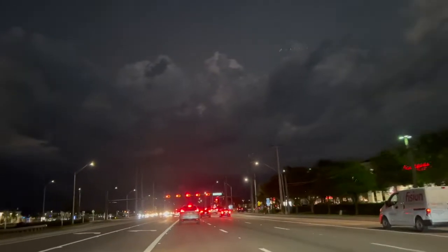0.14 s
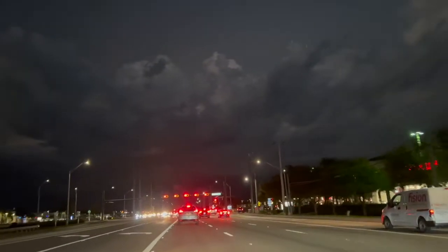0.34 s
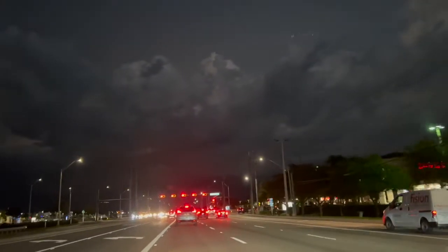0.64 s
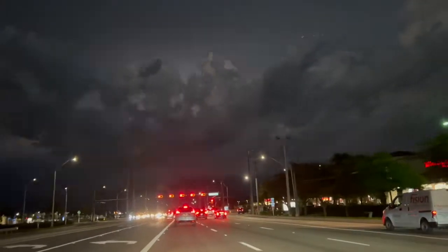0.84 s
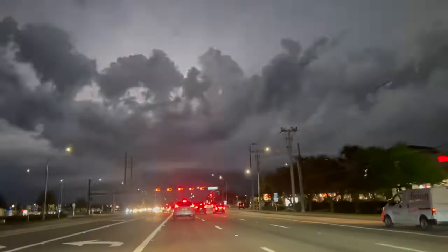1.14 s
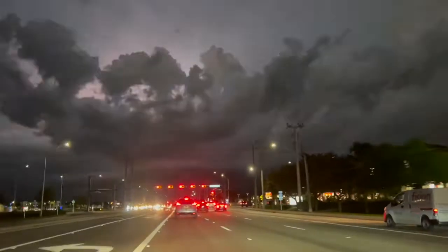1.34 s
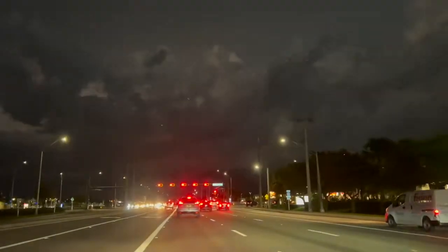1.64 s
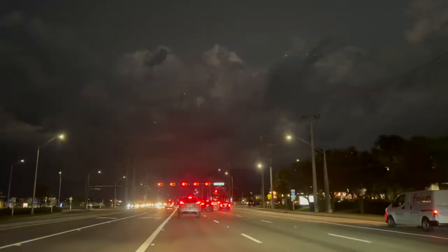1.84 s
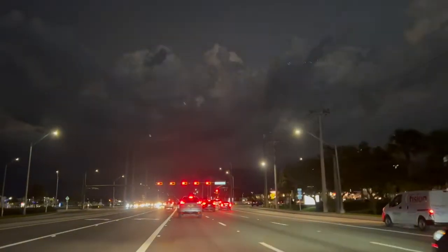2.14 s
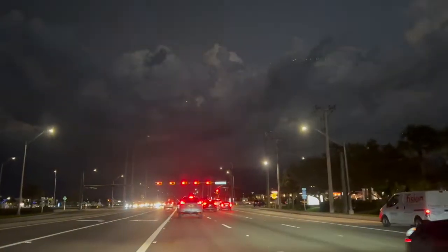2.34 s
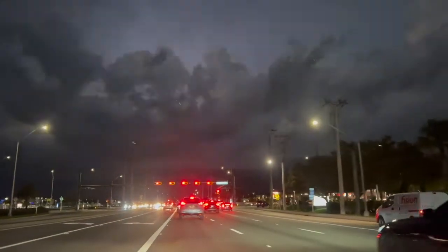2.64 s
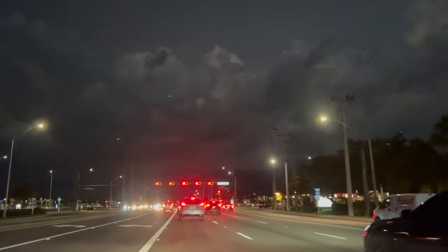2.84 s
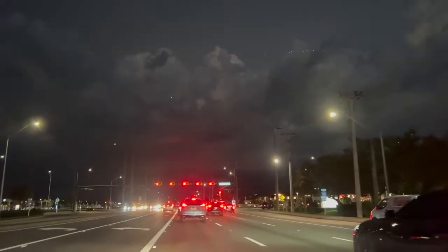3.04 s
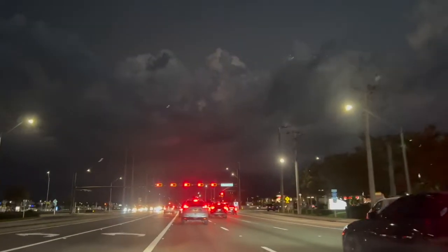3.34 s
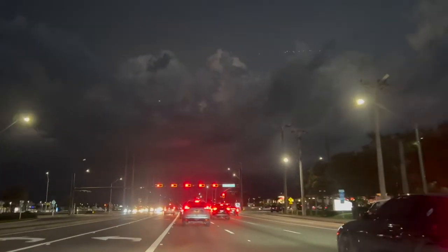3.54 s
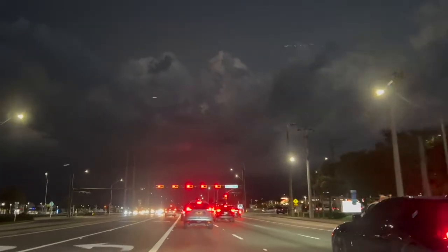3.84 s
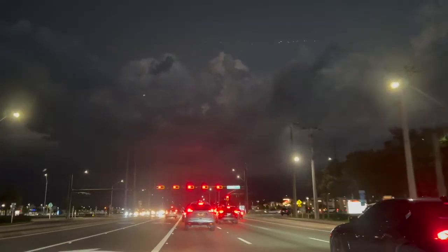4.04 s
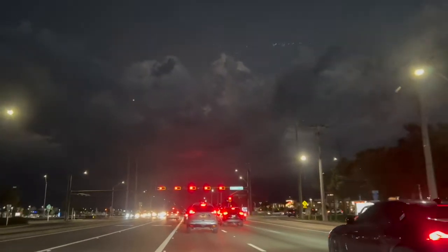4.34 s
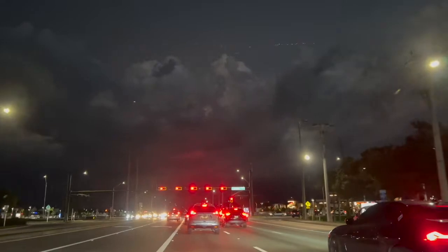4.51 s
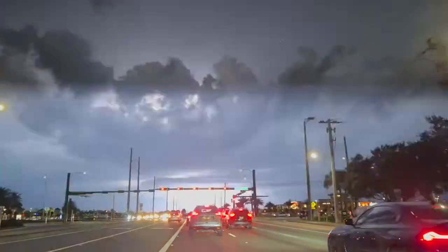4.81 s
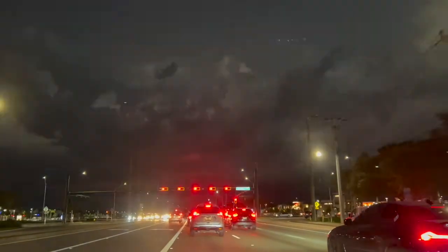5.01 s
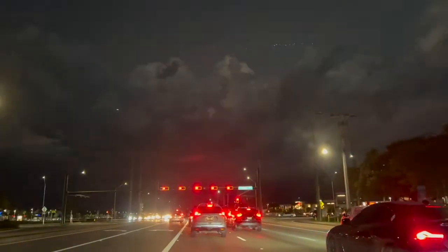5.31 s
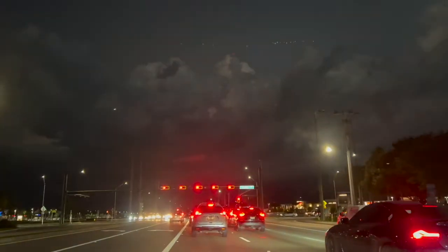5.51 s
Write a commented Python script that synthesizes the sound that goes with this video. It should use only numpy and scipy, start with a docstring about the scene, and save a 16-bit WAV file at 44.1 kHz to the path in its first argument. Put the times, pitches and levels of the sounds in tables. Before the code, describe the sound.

Heard from the front seat of a car slowing in evening traffic: a very low, nearly pure engine boom over road rumble, with soft vent air. Tyre wash and briefly singing tread fade over the first two to three seconds. Sparse raindrops tick on the windscreen, one sharpest just before one second. Engine pitch rises briefly midway, then sinks before recovering slightly at the end.

```python
"""Inside a car that slows in traffic under scattered rain.
The engine booms at its firing rate, with sine overtones that form a thin whine, an airy intake growl and a dull churn.
Shaped noise makes the road rumble, the vents, the fading tyre wash with its spray and the far traffic;
narrow noise bands make the tread sing. Two hums wander beneath.
Raindrops tick on the windscreen as clicks spread out by the glass, among a few soft rustles."""
import sys
import numpy as np
from scipy import signal
from scipy.fft import rfft, irfft, next_fast_len
from scipy.io import wavfile
from scipy.ndimage import uniform_filter1d

SR = 44100
rng = np.random.default_rng(int(sys.argv[2]) if len(sys.argv) > 2 else 0)


def generate_wav(sig):
    """Save sig (samples, or channels by samples) to the path in sys.argv[1] as 16-bit PCM at SR."""
    pcm = np.round(np.clip(np.atleast_2d(sig).T, -1, 1) * 32767).astype(np.int16)
    wavfile.write(sys.argv[1], SR, pcm)


N = 250047
TIME = np.arange(N) / SR

# engine speed: t/s, firing rate f/Hz
REVS = [(0, 48), (0.33, 46.2), (0.66, 46.8), (0.92, 45.6), (1.2, 46.1), (2.1, 44.6), (2.5, 50.8),
        (2.78, 51.6), (3.05, 51.1), (4.0, 45.2), (4.35, 42.4), (4.9, 40), (5.12, 41), (5.42, 45.6),
        (5.67, 46.3)]
# firing rate below which the boom and the whine lose level
BOOM_FULL_HZ = 45.6
# time constant of the slowing car
SLOWING_S = 2.18


def gain_of(db):
    """Decibels to a factor."""
    return 10 ** (np.asarray(db) / 20)


def evened(x):
    """Scales to rms 1."""
    return x / np.sqrt(np.mean(x ** 2) + 1e-20)


def read(points, hz):
    """Joins (f/Hz, value) points on a log-frequency axis."""
    f, value = np.transpose(points)
    return np.interp(np.log(hz + 1), np.log(f + 1), value)


def follow(rows):
    """Each column of a curve over time, sample by sample."""
    s, *columns = np.transpose(rows)
    return [np.interp(TIME, s, c) for c in columns]


def add(mix, s, sound):
    """Mixes a stereo sound in at time s."""
    start = max(round(s * SR), 0)
    part = mix[:, start:][:, :sound.shape[1]]
    part += sound[:, :part.shape[1]]


def sides(balance_db):
    """Left and right gains for a left-minus-right balance."""
    return gain_of(np.array([[balance_db], [-balance_db]]) / 2)


def drift(rate_hz):
    """Slow random wander of rms 1, up to about the given rate."""
    coarse = TIME[::8]
    hz = np.fft.rfftfreq(len(coarse), coarse[1])
    spectrum = rfft(rng.standard_normal(len(coarse))) * np.exp(-(hz / rate_hz) ** 2)
    return evened(np.interp(TIME, coarse, irfft(spectrum, len(coarse))))


def peaks(resonances, hz):
    """Lift in dB from resonances (f/Hz, width/Hz, level/dB)."""
    return sum(db / (1 + (2 * (hz - f) / width) ** 2) for f, width, db in resonances)


def standing_waves(hz):
    """The cabin favours some tones and swallows others: dB for sound in step and out of step at the ears."""
    # cabin modes: f/Hz, width/Hz, level in step/dB, level out of step/dB
    cabin = [(418, 30, 2.5, -1.5), (555, 78, 2, -4), (650, 81, 1.5, 7.5), (713, 83, 3.5, 2.5),
             (830.5, 63, 6.5, 3), (1050, 82, 3.5, 4), (1140, 33, -0.5, 0), (1161, 35, 4, 8.5),
             (1303, 78, 4, 1.5), (1380, 95, -2, -1.5), (1572, 160, 3, -1), (1690, 66, 4, 8),
             (1767, 47, -5, 0), (1850, 71, 5.5, -0.5), (1990, 110, -0.5, 2), (2164, 140, 3, -2.5),
             (2500, 43, -2.5, -5.5), (3060, 76, -2, -5.5), (4940, 78, 4, 5.5), (5500, 340, -4, 2.5),
             (6860, 300, -2.5, -4)]
    return sum(np.array([[in_db], [out_db]]) / (1 + (2 * (hz - f) / width) ** 2)
               for f, width, in_db, out_db in cabin)


def cabin_noise(spectrum, low_hz, balance_db, resonances=(), ripple_db=2.5):
    """Noise of rms 1 before balance; standing waves colour it and set the ears in or out of step."""
    # likeness of the two ears: f/Hz, correlation (-1..1)
    likeness = [(100,0.92), (270,0.95), (430,0.21), (620,-0.57), (730,-0.71), (870,-0.046), (1120,-0.57),
                (1400,-0.18), (1580,.2), (1750,-0.31), (2100,-0.18), (6500,0.42), (9800,-0.55),
                (12000,-0.026)]
    size = next_fast_len(N)
    hz = np.fft.rfftfreq(size, 1 / SR)
    same = np.clip(read(likeness, hz), -.999, .999)
    mid_side = rfft(rng.standard_normal((2, size))) * np.sqrt([1 + same, 1 - same])
    mid, side = mid_side * gain_of(standing_waves(hz))
    # in the treble countless small modes crowd into a fine ripple, different at each ear
    ripple = evened(uniform_filter1d(rng.standard_normal((2, len(hz))), size=400))
    ripple *= hz ** 2 / (hz ** 2 + 2200 ** 2) / (1 + (hz / 9000) ** 4)
    colour = gain_of(read(spectrum, hz) + peaks(resonances, hz) + ripple_db * ripple)
    colour *= hz ** 3 / (hz ** 3 + low_hz ** 3)  # low cut
    ears = irfft(np.array([mid + side, mid - side]) * colour, size)[:, :N]
    return sides(balance_db) * evened(ears)


def fuzzy_band(centre_hz, width_hz):
    """Narrow noise of rms about 1 around a fixed or moving centre."""
    turns = np.cumsum(centre_hz * np.ones(N)) / SR
    return ((drift(width_hz) + 1j * drift(width_hz)) * np.exp(2j * np.pi * turns)).real


def wide_band(centre_hz, width_hz, spread):
    """A narrow band of noise that differs between the ears."""
    mid, side = (fuzzy_band(centre_hz, width_hz) for _ in range(2))
    return np.array([mid + spread * side, mid - spread * side])


def far_hiss(level_db=-70, centre_hz=2750, width_hz=480, flutter_db=1.5):
    """Distant traffic is an uneven hiss throughout, independent at each ear."""
    ears = np.array([fuzzy_band(centre_hz, width_hz) for _ in range(2)])
    return gain_of(level_db + flutter_db * drift(25)) * ears


def vents(level_db=-45, flutter_db=0.99):
    """Air rushes from the vents with a slight flutter, through hollow duct tones."""
    # colour of the air: f/Hz, relative density/(dB per Hz)
    air = [(420,1), (600,0), (760,-7), (900,-1.5), (1120,-6.5), (1380,-4), (1600,-5.5), (2000,-14.5),
           (2200,-12.5), (2500,-21.5), (3600,-27), (5500,-28.5), (7500,-34), (9500,-42.5), (15000,-37.5)]
    # duct resonances: f/Hz, width/Hz, level/dB
    ducts = [(919, 70, 4.5), (1553, 55, 2.5), (1835, 36, 5.5)]
    return gain_of(level_db + flutter_db * drift(29.0)) * cabin_noise(
        air, low_hz=235, balance_db=0.0, resonances=ducts)


def drone(drone_hz=110.0, wander_hz=2.09, waver=0.08):
    """A low hum that stays around one pitch whatever the revs, and comes and goes."""
    # hum: t/s, level/dB
    hum_level = [(0, -28), (1.1, -36.5), (1.45, -34.5), (2.1, -36.5), (2.9, -40), (3.4, -41), (4.6, -45),
                 (5.3, -34.5), (5.67, -34)]
    level_db, = follow(hum_level)
    angle = 2 * np.pi * np.cumsum(drone_hz + wander_hz * drift(5.7)) / SR
    return np.sqrt(2) * gain_of(level_db) * (1 + waver * drift(5.4)) * np.sin(angle)


def wavering(centre_hz, wander_hz, waver):
    """A tone of rms about 1 that trembles in pitch and level."""
    angle = 2 * np.pi * np.cumsum(centre_hz + wander_hz * drift(25)) / SR
    return np.sqrt(2) * (1 + waver * drift(21)) * np.sin(angle)


def sinking_hum(balance_db=-2.5, blur=0.54, width_hz=16):
    """A soft, slightly blurred hum that sinks slowly as the car loses speed."""
    # hum: t/s, centre f/Hz, level/dB
    sinking = [(0, 350, -54), (.9, 336, -49.5), (1.5, 330, -49), (2.0, 322, -45.5), (2.3, 318.7, -46.5),
               (2.7, 318, -49.5), (3.4, 307.3, -49.5), (4.2, 284.8, -62)]
    centre_hz, level_db = follow(sinking)
    tone = wavering(centre_hz, wander_hz=7.0, waver=0.15)
    hum = tone + blur * wide_band(centre_hz, width_hz, spread=0.82)
    return gain_of(level_db) * sides(balance_db) * evened(hum)


def road(slow_db=-33.5, extra_db=12.5, uneven_db=0.6):
    """The road surface shakes the body, less as the car slows and more on rough patches."""
    # rumble through the suspension: f/Hz, relative density/(dB per Hz)
    rumble = [(25, -38), (37, 4), (60, 4), (78, -2), (100, -1.5), (128, -7), (160, -10), (210, -16.5),
              (255, -16.5), (310, -21), (370, -25.5), (480, -39.5), (700, -57), (1500, -89)]
    # rougher asphalt: t/s, extra level/dB, half length/s
    rough_patches = [(0.25, 0, 0.087), (1.561, 2.5, 0.095), (2.839, 4.5, 0.32), (3.78, 4.5, 0.19)]
    rough_db = sum(db * np.exp(-((TIME - s) / length) ** 2) for s, db, length in rough_patches)
    settling_db = slow_db + extra_db * np.exp(-TIME / SLOWING_S)
    level_db = settling_db + rough_db + uneven_db * drift(1)
    return gain_of(level_db) * cabin_noise(rumble, low_hz=24.7, balance_db=-0.5)


def spray(at_s=0.85, half_length_s=0.21, top_db=-58):
    """A brief swell of brighter hiss during the tyre wash."""
    # colour of the spray: f/Hz, relative density/(dB per Hz)
    spray_colour = [(1500, -26.5), (2300, -7), (2800, 8), (3300, -2), (4200, -16.5), (9000, -34.5)]
    swell = np.exp(-((TIME - at_s) / half_length_s) ** 2)
    return gain_of(top_db) * swell * cabin_noise(spray_colour, low_hz=1200, balance_db=-2.0)


def tread(width_hz=60, spread=0.8, chatter_db=1.5, chatter_hz=45):
    """Chattering bands of tread noise swell and fade, lighting the cabin's standing waves in turn."""
    # singing pavement: t/s, centre f/Hz, level ahead of the cabin/dB, Gaussian spread/s
    singing = [(.4, 1160, -56.5, 0.31), (0.724, 1010, -47, 0.075), (1.036, 916, -48.5, .13),
               (1.353, 950, -50.5, 0.091), (1.702, 1005, -51.5, .12), (1.975, 955, -52, .14)]
    bands = np.zeros((2, N))
    for s, hz, db, length in singing:
        swell = gain_of(db) * np.exp(-((TIME - s) / length) ** 2 / 2)
        bands += swell * np.array([fuzzy_band(hz, width_hz), spread * fuzzy_band(hz, width_hz)])
    bands *= evened(gain_of(chatter_db * drift(chatter_hz)))
    size = next_fast_len(N + SR)
    modes = gain_of(standing_waves(np.fft.rfftfreq(size, 1 / SR)))
    mid, side = irfft(rfft(bands, size) * modes, size)[:, :N]
    return np.array([mid + side, mid - side])


def tyres(patchy_db=2.0, pivot_hz=900):
    """A broad, patchy wash that dies away; its spectrum tilts brightest at about one second."""
    # colour of the wash: f/Hz, relative density/(dB per Hz)
    wash = [(300, -2), (480, -1), (620, -10.5), (780, -10), (1000, -7), (1250, -10), (1600, -16.5),
            (2100, -20.5), (3000, -28.5), (4000, -34), (6500, -39), (8500, -41.5), (10300, -59),
            (11800, -46), (13500, -46.5), (15500, -57.5)]
    # wash through the glass: t/s, level/dB
    wash_level = [(0, -37), (.85, -37), (1.2, -38.5), (2.05, -43), (2.501, -48), (3.2, -53), (5.67, -74)]
    # tones the side windows let through: f/Hz, width/Hz, level/dB
    windows = [(1990, 130, 4.5), (1990, 150, 3), (2730, 260, 3)]
    bright_at_s, bright_for_s = 1, 0.59
    base_tilt, bright_tilt = 0.57, 0.5  # dB per octave
    s, level_db = np.transpose(wash_level)
    noise = cabin_noise(wash, low_hz=230, balance_db=1.1, resonances=windows)
    hz, t, z = signal.stft(noise, SR, nperseg=1024)
    octaves = np.clip(np.log2((hz[:, None] + 1) / pivot_hz), -2, 2)
    tilt = base_tilt + bright_tilt * np.exp(-((t - bright_at_s) / bright_for_s) ** 2)
    # smooth random blotches over frequency and time
    patches = uniform_filter1d(rng.standard_normal(z.shape), size=14, axis=0)
    patches = evened(uniform_filter1d(patches, size=7, axis=1))
    z = z * gain_of(np.interp(t, s, level_db) + tilt * octaves + patchy_db * patches)
    return signal.istft(z, SR, nperseg=1024)[1][:, :N]


def rustles():
    """Little puffs of hiss that swell and die within milliseconds."""
    # puffs: t/s, level/dB, length/s
    puffs = [(0.914, -47.5, 0.0033), (0.923, -48, 0.0045), (0.976, -51.5, 0.0052), (3.318, -58, 0.0065)]
    # colour of the hiss: f/Hz, relative density/(dB per Hz)
    puff_colour = [(1500, -22.5), (3500, -2), (6000, 3.5), (8500, 1), (13000, -12), (16000, -16)]
    envelope = np.zeros(N)
    for s, db, length in puffs:
        age = np.maximum(TIME - s, 0) / (length / 2)
        envelope += gain_of(db) * age * np.exp(1 - age)
    return envelope * cabin_noise(puff_colour, low_hz=1215, balance_db=-2.5, ripple_db=-0.5)


def knock(weight_db, middling_db=-29, knock_db=-51.5, growth=5):
    """A drop wakes the low modes of the pane, growing steeply (dB per dB) with its weight."""
    # pane modes: f/Hz, relative level/dB, t60/s
    pane = [(680, -1, 0.088), (780, 4, .06), (1000, 0, .03), (1480, 1, .022)]
    t = TIME[:2048]
    ring = sum(gain_of(db - 60 * t / t60) * np.sin(2 * np.pi * (hz * t + rng.random((2, 1))))
               for hz, db, t60 in pane)
    swell = 1 - np.exp(-(t / 0.003) ** 4)
    return gain_of(knock_db + growth * (weight_db - middling_db)) * swell * ring


def raindrops(ring_db=-7, ring_t60=0.057, splash_db=-20, size_db=-1, travel_s=0.0017, edge_db=-8):
    """Bending waves carry each tap through the glass, treble first; the edge echoes and the splash fizzes."""
    # drops: t/s, level before size_db/dB, left minus right/dB, extra level below body_hz/dB
    drops = [(0.115, -31.5, -1, -2), (0.348, -30.5, 0, -4), (0.8315, -22, 2.5, -4), (0.8584, -32.5, 5, 2),
             (1.6138, -34.5, 8, -4), (1.673, -40.5, 19.5, 2), (1.7993, -43.5, 11.5, -1),
             (1.884, -41.5, 12, -2), (2.119, -31.5, 4, -3), (2.15, -38.5, 5, 2.5), (2.22, -41.5, 14, 0),
             (3.8116, -26.5, 1, -5.5), (3.9417, -31, 0, -6), (4.055, -37, 5, 0.5), (4.5098, -41, 6, 1),
             (5.0282, -35.5, 3, -2.5), (5.403, -32.5, 2.5, -2.5)]
    # colour of a drop on the glass: f/Hz, level/dB
    glass_colour = [(300, -10.5), (900, 1.5), (2200, -2.5), (3200, 0.5), (4200, -1.5), (5700, -2),
                    (6800, -0.5), (7400, -13), (9500, -21), (15500, -45)]
    # wait for the echo from the pane's edge: shortest/s, longest/s
    edge_echo_s = (0.0003, 0.0011)
    body_hz, spread_s = 3350, 0.0007
    t = TIME[:2048]
    hz = np.fft.rfftfreq(len(t), 1 / SR)
    delay = travel_s + spread_s * np.sqrt(3000 / (hz + 200))
    # summing the delay over frequency gives the phase
    glass = gain_of(read(glass_colour, hz)) * np.exp(-2j * np.pi * np.cumsum(delay) * hz[1])
    glass_peak = abs(irfft(glass)).max()
    out = np.zeros((2, N))
    for s, db, balance_db, body_db in drops:
        scatter = rng.standard_normal((2, len(t))) * gain_of(-60 * t / ring_t60)
        scatter /= np.linalg.norm(scatter[0])
        wait_s = rng.uniform(*edge_echo_s, (2, 1))
        edge = 1 + gain_of(edge_db) * np.exp(-2j * np.pi * hz * wait_s)
        colour = glass * edge * gain_of(body_db / (1 + (hz / body_hz) ** 6))
        tap = (t == 0) + gain_of(ring_db) * scatter
        splash = gain_of(splash_db) * np.diff(scatter, prepend=0) / 2
        tick = (irfft(rfft(tap) * colour) + splash) / glass_peak
        add(out, s, gain_of(db + size_db) * sides(balance_db) * tick + knock(db + body_db))
    return out


def engine_bay(level_db=-40, lugging_db_per_hz=0.32):
    """Belts and valve gear churn dully, a little more as the engine lugs at low revs."""
    # churn through the bulkhead: f/Hz, relative density/(dB per Hz)
    bay = [(80, -12.5), (140, -1.5), (200, 1.5), (260, -5.5), (330, -12.5), (450, -28.5), (900, -69.5)]
    firing_hz, = follow(REVS)
    lugging_db = lugging_db_per_hz * (BOOM_FULL_HZ - firing_hz)
    return gain_of(level_db + lugging_db) * cabin_noise(bay, low_hz=60.3, balance_db=-0.5)


def intake(multiple=6.5, width_hz=36, top_db=-48, full_hz=49, db_per_hz=4.5, balance_db=2, spread=0.45):
    """An airy growl just above the first whine overtone that comes up quickly with the revs."""
    firing_hz, = follow(REVS)
    level_db = top_db - db_per_hz * np.maximum(full_hz - firing_hz, 0)
    return gain_of(level_db) * sides(balance_db) * wide_band(multiple * firing_hz, width_hz, spread)


def overtones(balance_db_per_hz=0.0439, waver=0.18, whine_from=6, whine_fall_db_per_hz=1.5):
    """Lines tied to the firing swell near panel resonances; the high ones whine and fade at low revs."""
    # overtones of the firing: multiple, level ahead of the panels/dB
    lines = [(2, -40.5), (3, -49.5), (3.5, -49), (4, -56), (5, -57), (6, -48.5)]
    # body panels that lift an overtone: f/Hz, width/Hz, level/dB
    panels = [(85.6, 11, 2.5), (136.5, 20, 10), (274.7, 12, 5), (304, 30, 2.5)]
    firing_hz, = follow(REVS)
    angle = 2 * np.pi * np.cumsum(firing_hz) / SR
    sag_db = -whine_fall_db_per_hz * np.maximum(BOOM_FULL_HZ - firing_hz, 0)
    out = np.zeros((2, N))
    for multiple, db in lines:
        multiple = round(2 * multiple) / 2  # whole and half orders
        hz = multiple * firing_hz
        phase = rng.uniform(0, 2 * np.pi) + waver * drift(2.9)
        line = (1 + waver * drift(3.5)) * np.sin(multiple * angle + phase)
        level_db = db + peaks(panels, hz) + sag_db * (multiple >= whine_from)
        out += np.sqrt(2) * gain_of(level_db) * sides(balance_db_per_hz * hz.mean()) * line
    return out


def boom(full_db=-17, fall_db_per_hz=1.18, dip_s=0.026, flutter_db=0.8, jolted_flutter_db=0.3):
    """A nearly pure tone at the firing rate: it steadies as the car slows and sags at low revs."""
    # brief dips in level: t/s, depth/dB
    brief_dips = [(0.046, 25), (0.33, 35), (0.54, 7.5), (1.1, 8.5), (1.259, 11), (1.49, 12), (1.85, 2),
                  (4.46, 10), (4.59, 7), (4.82, 13), (4.89, 10), (5.13, 7), (5.18, 6)]
    firing_hz, = follow(REVS)
    sag_db = -fall_db_per_hz * np.maximum(BOOM_FULL_HZ - firing_hz, 0)
    dip_db = sum(depth_db * np.exp(-((TIME - s) / dip_s) ** 2) for s, depth_db in brief_dips)
    waver_db = (flutter_db + jolted_flutter_db * np.exp(-TIME / SLOWING_S)) * drift(30)
    tone = np.sin(2 * np.pi * np.cumsum(firing_hz) / SR)
    return np.sqrt(2) * gain_of(full_db + sag_db + waver_db - dip_db) * tone


def scene():
    """Everything heard from the front seat."""
    traffic = far_hiss() + spray() + tread() + tyres()
    rain = rustles() + raindrops()
    engine = engine_bay() + intake() + overtones() + boom()
    return vents() + drone() + sinking_hum() + road() + traffic + rain + engine


def record(dry, low_cut_hz=29, edge_hz=15800):
    """The microphone's low cut and the recorder's band limit."""
    hz = np.fft.rfftfreq(N, 1 / SR)
    cut = irfft(rfft(dry) * (1 - 1 / (1 + (hz / low_cut_hz) ** 10)), N)
    lowpass = signal.firwin(511, edge_hz, window=("kaiser", 9), fs=SR)
    return signal.oaconvolve(cut, lowpass[None], "same")


dry = scene()
out = record(dry)
generate_wav(out)
```